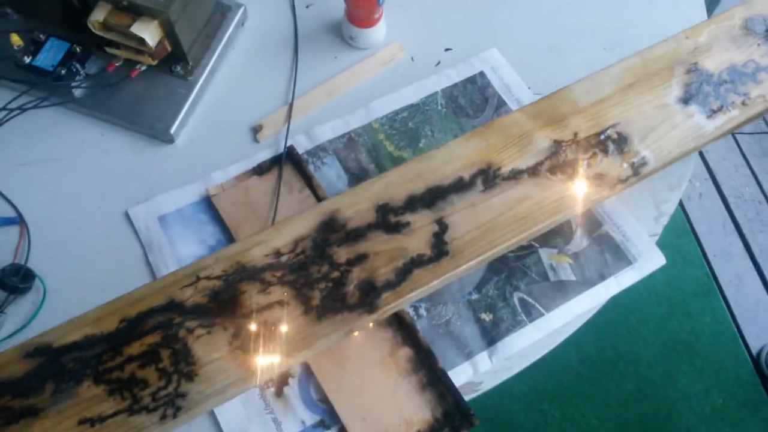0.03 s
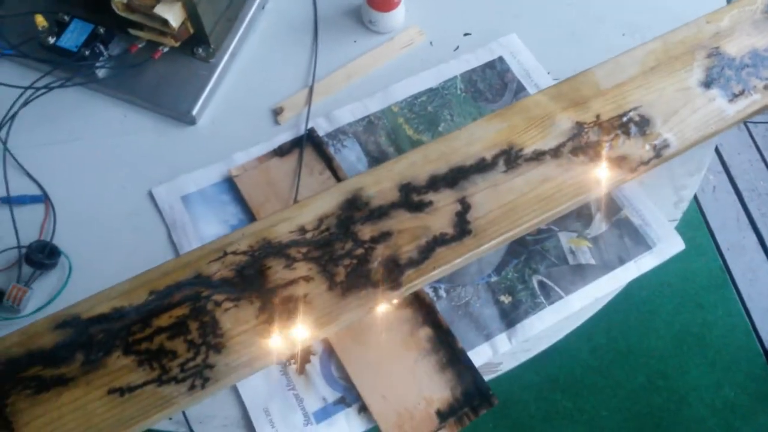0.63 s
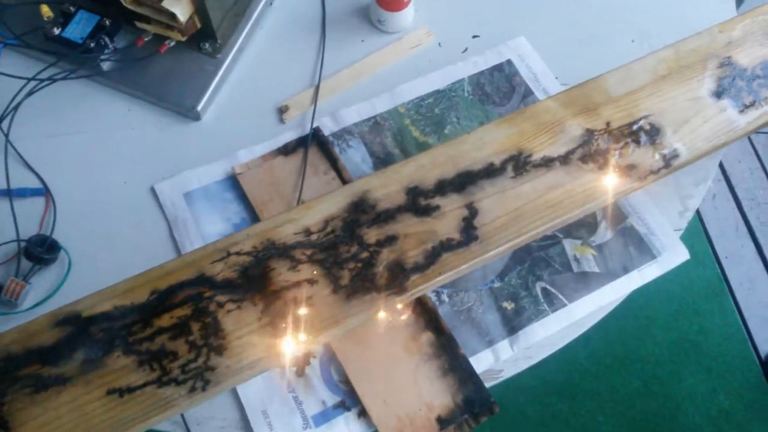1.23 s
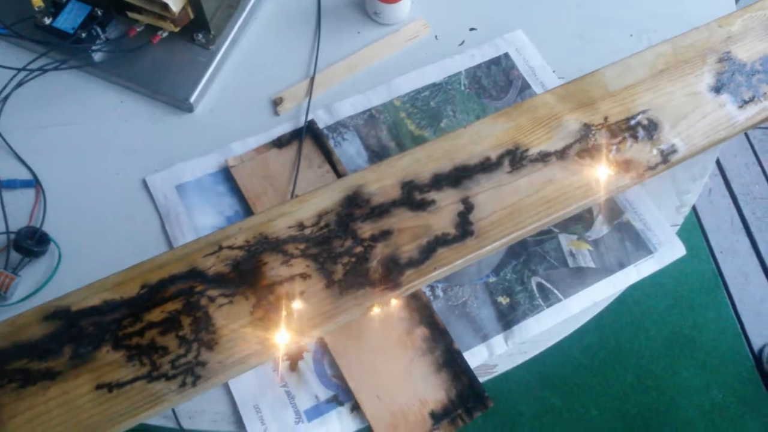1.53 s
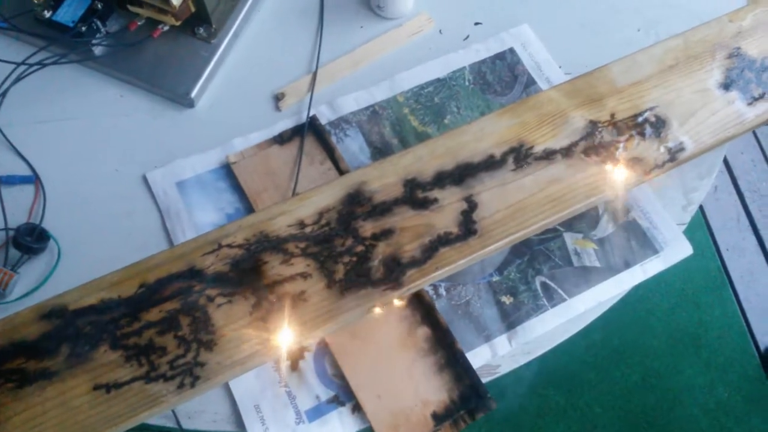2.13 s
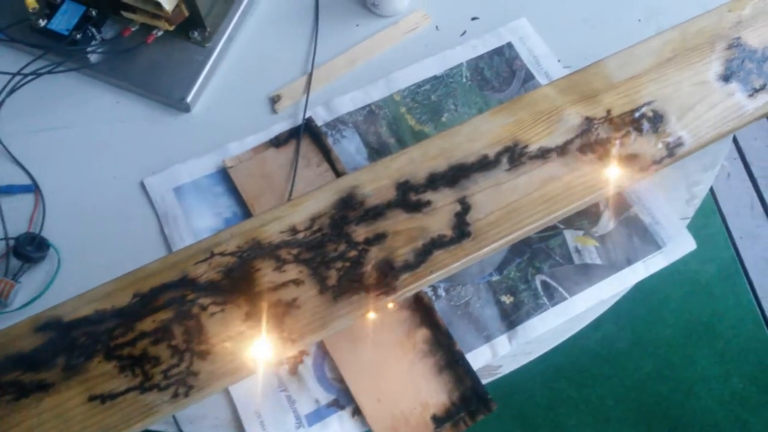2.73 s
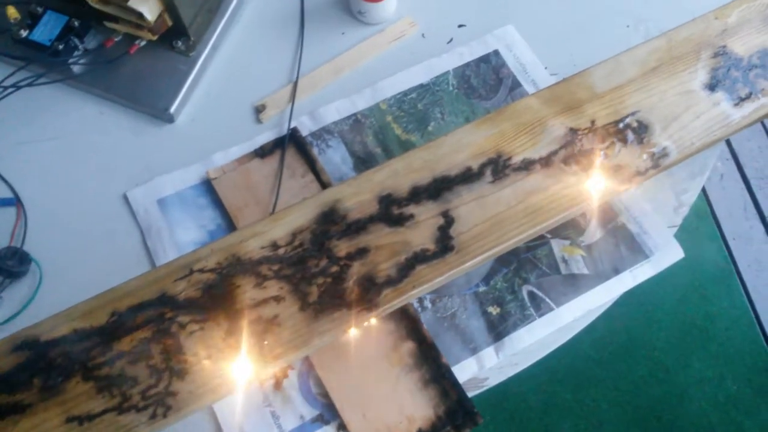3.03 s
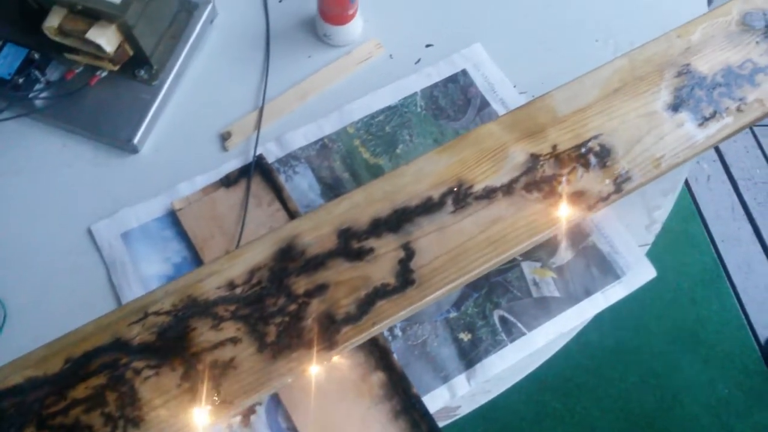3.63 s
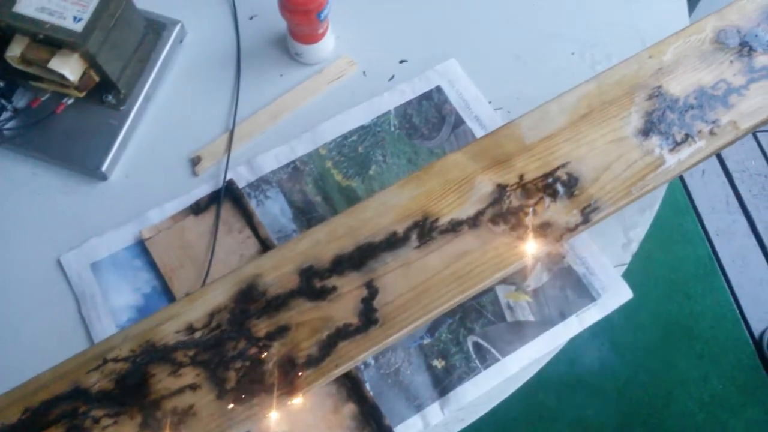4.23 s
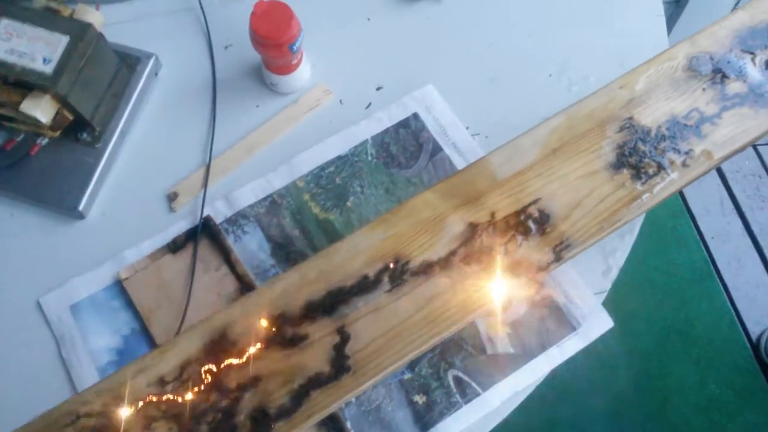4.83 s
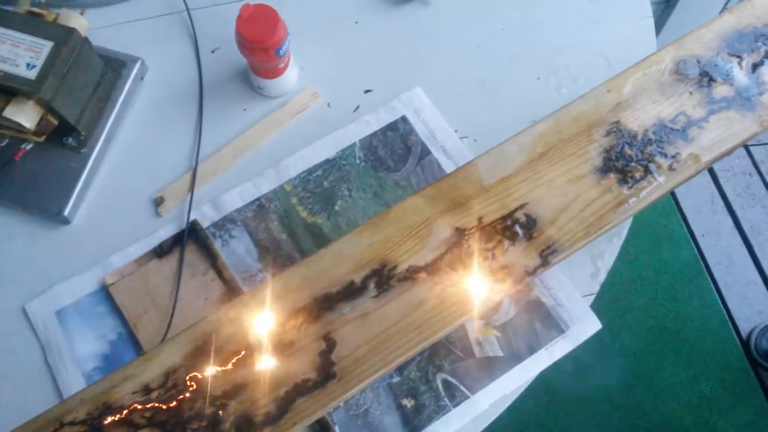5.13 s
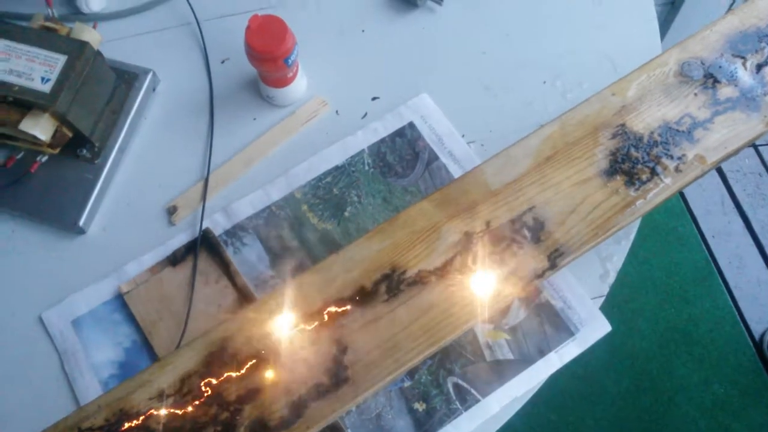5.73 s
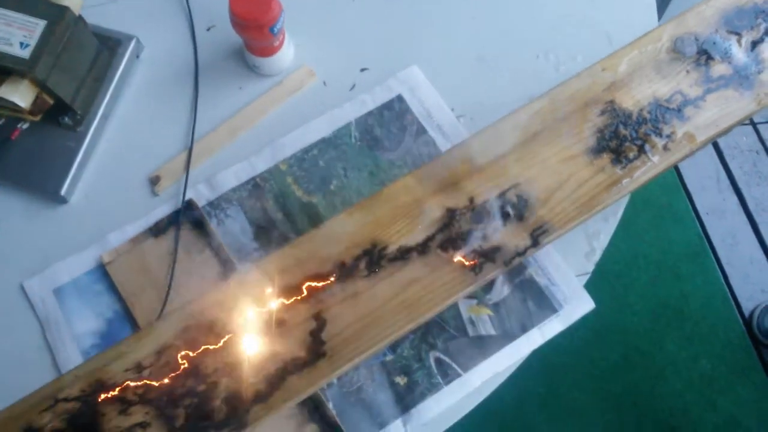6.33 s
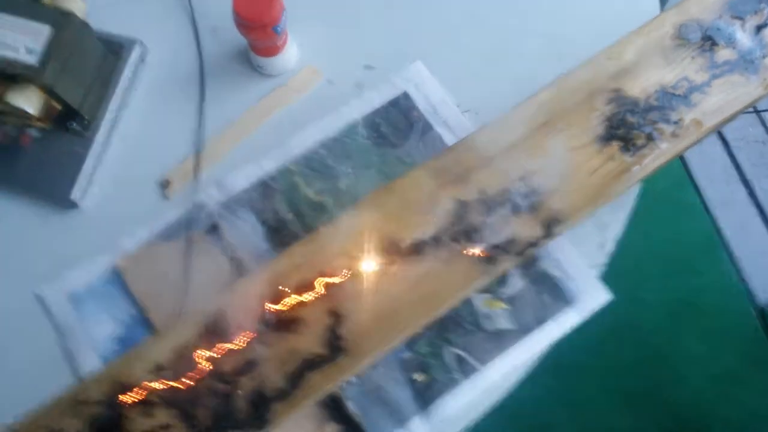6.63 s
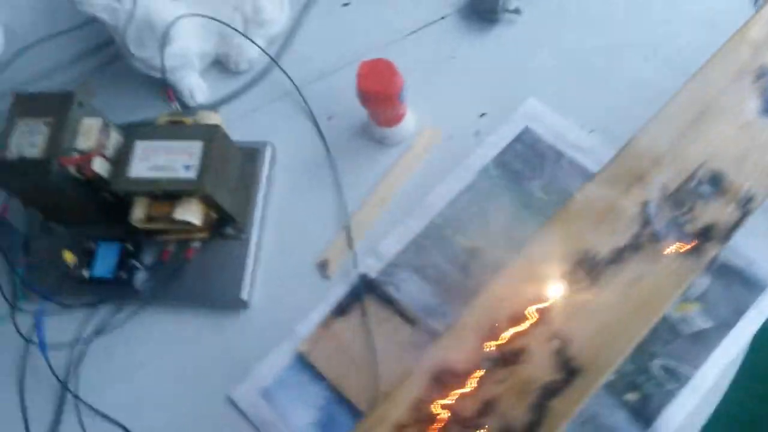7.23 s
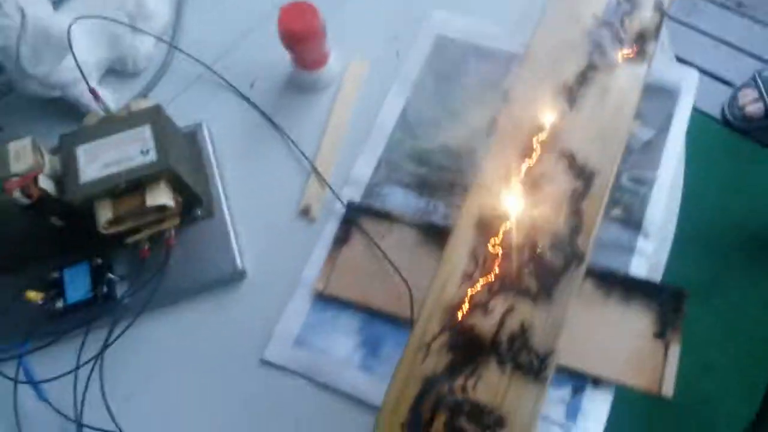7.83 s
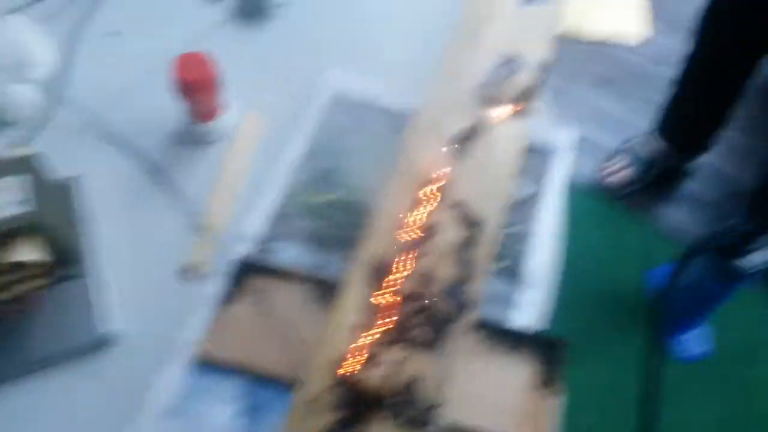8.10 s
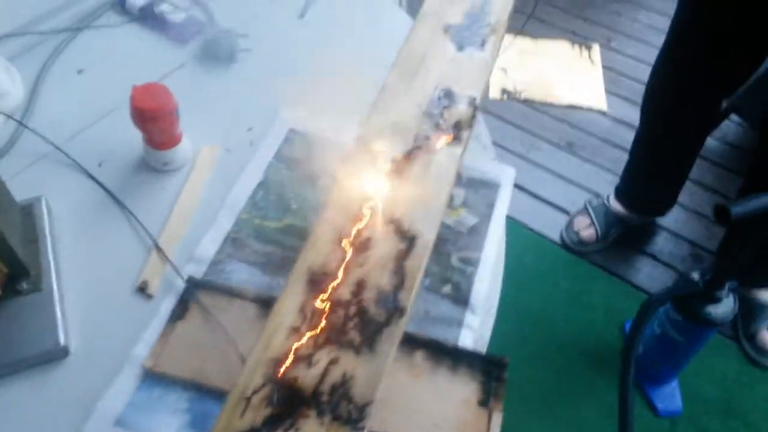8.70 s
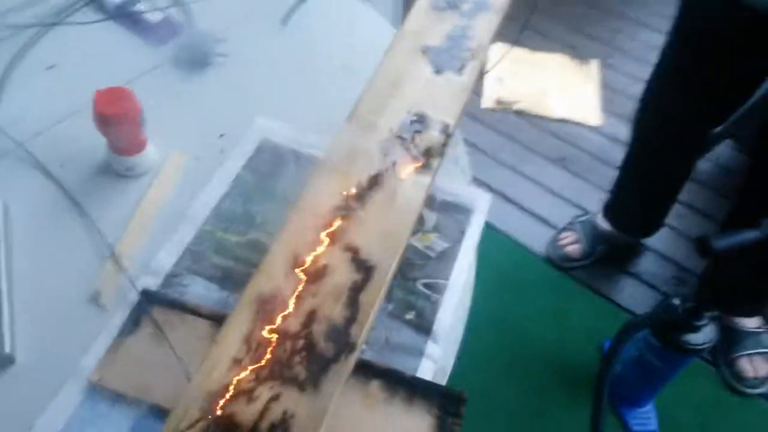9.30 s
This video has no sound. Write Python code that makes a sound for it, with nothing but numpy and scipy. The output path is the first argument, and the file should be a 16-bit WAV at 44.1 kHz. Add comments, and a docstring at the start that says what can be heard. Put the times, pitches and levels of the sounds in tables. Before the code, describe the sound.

A steady low transformer hum, near 200 hertz with buzzy overtones, runs for the whole nine and a half seconds, outdoors over a faint distant rumble and smooth hiss. Electric arcs on a damp plank add a thin, high, pulsing fizz, slightly left, with faint dry crackle and sputtering sap. Soft puffs of steam come in the first half second. The crackle builds over the first second and a half, with small pops around 1.4, 1.8, 2.4 and 2.7 seconds. From 4.6 seconds the arcs break into short flare-ups, with more pops, the strongest at 4.9 and 6.3, and a faint steam whistle at 6.8. After 7 seconds the sizzle is weaker. A dull, hollow thump lands at 7.9. Fingers brush the close hand-held microphone at 8.8, then knock and click on it about five times between 9.1 and 9.3, the loudest moment. The hum continues.

```python
"""Outdoors, at a table: mains transformers hum while their high voltage burns a track along a damp plank.
Arcs on the wood fizz and crackle in time with the current, with small pops, sputtering sap and puffs
of steam, then calm to flare-ups as the track glows. Near the end something thumps dully, and fingers
brush and tap a hand-held camera. A distant rumble and a smooth hiss lie under it all."""
import sys
import numpy as np
from scipy import signal
from scipy.fft import rfft, irfft
from scipy.io import wavfile
from scipy.ndimage import uniform_filter1d

SR = 44100
rng = np.random.default_rng(int(sys.argv[2]) if len(sys.argv) > 2 else 0)


def to_wav(sig):
    """Store sig (one row per channel, or 1-D mono) as 16-bit WAV at the path in sys.argv[1].

    Samples outside -1..1 are clipped; the rate is SR.
    """
    pcm = np.clip(np.atleast_2d(sig), -1, 1) * 32767
    pcm = np.round(pcm).astype(np.int16)
    wavfile.write(sys.argv[1], SR, pcm.T)  # frames by channels


N = 421596
TIME = np.arange(N) / SR
BINS = np.fft.rfftfreq(N, 1 / SR)
GLOW_S = 4.62  # the charred track starts to conduct
USUAL_DB = -60  # arc strength at which fizz and crackle sit at their base levels

# Flare-ups of the arcs. Each row: start in seconds, length in seconds, strength in dB, extra crackle in dB.
FLARES = [(4.388, 0.17, -58, 0), (4.715, 0.33, -61, 3.5), (5.037, 0.34, -62.5, 4), (5.352, 0.33, -58, 0),
          (5.817, .14, -59, 1), (6.023, 0.4, -61.5, -2), (6.74, .15, -61.5, -2), (6.89, 0.11, -60.5, -4),
          (7.88, 1.38, -65, 1.5)]
# Stereo image of crackle and thump noise. Each row: frequency in Hz, likeness from 0 (wide) to 1 (mono).
CRACKLE_LIKENESS = [(100, 0.77), (700, 0.88), (1500, 0.45), (3000, 0.36), (16000, 0.091)]


def hum(mains_cycles, arc_db, load_s=0.3, charring_db=3.0, smear=0.0299, sway=0.048):
    """The cores flex twice a cycle; the partials shift with the load of the arcs and the charring track."""
    # Hum partials. Each row: multiple of the mains (rounded to even for the pitch), level in dB before
    # and after the glow, left over right in dB, flutter depth, dB gained per dB of load.
    partials = [(2, -68, -65.5, -1, 1.47, 0.43), (4.1, -44, -45, -1.5, 0.045, 0.3),
                (5.56, -54.5, -53.5, -3, 0.06, 0.14), (7.7, -62, -60.5, -.5, 0.14, 1.17),
                (9.8, -74.5, -65.5, -4.5, 0.16, 0.5), (12.4, -64.5, -68.5, -2, 0.078, 1),
                (13.8, -66.5, -64.5, -3, 0.052, 0.14), (15.73, -67, -73, -1, 0.047, 0.24),
                (18, -83, -83, -1, 0.28, -2), (19.96, -77, -73, 3, 0.18, 0.6),
                (22.2, -76.5, -81, 2, 0.22, -0.5), (25.2, -102, -79, 2, 0.17, 0),
                (26.05, -77.5, -78.5, -5, 0.16, 0.5), (27.96, -80.5, -80.5, 5, 0.83, 1.5),
                (29.7, -85.5, -81, 1, 0.43, 3)]
    glow = np.clip((TIME - GLOW_S) / 0.11 + .5, 0, 1)
    load_db = uniform_filter1d(arc_db - np.median(arc_db), round(load_s * SR))
    load_db += charring_db * (1 - glow) * (TIME / GLOW_S - .5)
    out = np.zeros((2, N))
    for multiple, first_db, glow_db, side_db, flutter, follow in partials:
        # the casing and the moving camera delay high partials more
        lag = smear * multiple ** 2 + sway * multiple * wander(hz=0.48)
        harmonic = 2 * round(multiple / 2)
        phase = 2 * np.pi * harmonic * mains_cycles - lag
        tone = (1 + flutter * wander(hz=15.0)) * np.cos(phase)
        tone += flutter * wander(hz=5.8) * np.sin(phase)
        level_db = first_db + glow * (glow_db - first_db) + follow * load_db
        out += sides(side_db) * np.sqrt(2) * tone * amp(level_db)
    return out


def arc_strength(ember_db=-67, quench_s=.025, flicker_db=0.67, flicker_hz=14.0):
    """Flickering strength in dB: arcs creep until the track shorts them, then only flare over embers."""
    # Arcs creeping over the damp wood. Each row: time in seconds, strength in dB.
    creep_db = [(0, -71), (.3, -65.5), (.92, -61), (1.15, -61), (1.45, -59), (1.72, -60.5), (2.62, -61),
                (3.3, -58), (3.55, -58), (4.0, -60.5), (4.6, -59.5)]
    creeping = amp(curve(creep_db)) * np.exp(-np.maximum(TIME - GLOW_S, 0) / quench_s)
    flares = [amp(ember_db + (db - ember_db) * flare(s, length_s)) for s, length_s, db, _ in FLARES]
    strongest = np.max([creeping, *flares], axis=0)
    return 20 * np.log10(strongest) + flicker_db * wander(hz=flicker_hz)


def flare(start_s, length_s, rise_s=0.038, fall_s=0.045):
    """Envelope from 0 to 1: a flare-up catches, burns for a while and dies."""
    attack = np.clip((TIME - start_s) / rise_s, 0, 1)
    return attack * np.exp(-np.maximum(TIME - start_s - length_s, 0) / fall_s)


def ignition(mains_cycles, lag, depth_db, uneven_db):
    """Arcs light on every half cycle, each time with a strength of their own."""
    half_cycles = 2 * mains_cycles - lag
    strength = rng.standard_normal(int(half_cycles[-1]) + 3)[np.round(half_cycles).astype(int)]
    pulse_db = depth_db * np.cos(2 * np.pi * half_cycles)
    return unit(amp(pulse_db + uneven_db * strength * np.cos(np.pi * half_cycles) ** 2))


def sparks(per_s, spread_db):
    """Tiny discharges of random size in each channel."""
    size = amp(spread_db * np.minimum(rng.exponential(1, (2, N)), 4))
    polarity = rng.choice([-1, 1], (2, N))
    fires = rng.random((2, N)) < per_s / SR
    return unit(size * polarity * fires)


def fizz(mains_cycles, arc_db, base_db=-55.5, steepness=1.25):
    """Bright sizzle of the arcs, chopped by the current; it fades faster than the arcs do."""
    # Tone of the sizzle. Each row: frequency in Hz, gain in dB.
    sizzle_eq = [(1500, -9), (3000, -11.5), (5000, -4), (7500, -12), (9700, -5), (10800, -8.5), (12300, -5),
                 (13500, -0.5), (15300, -3), (16500, -25)]
    # The sizzle leans mostly left. Each row: frequency in Hz, left over right in dB.
    sizzle_pan = [(2000, 9), (5000, 4.5), (7500, -5), (9700, 7), (11000, 4), (13500, 9.5), (16000, 10)]
    discharges = sparks(per_s=16000, spread_db=1.6)
    discharges *= ignition(mains_cycles, lag=0.16, depth_db=4.0, uneven_db=3.5)
    sizzle = colour(discharges, sizzle_eq)
    panned = irfft(rfft(sizzle) * sides(on_bins(sizzle_pan)), N)
    return amp(base_db + steepness * (arc_db - USUAL_DB)) * unit(panned)


def crackle(mains_cycles, arc_db, base_db=-58.0, snap_follow=1.53, sap_follow=0.52):
    """Dry fibres snap and sap sputters under the arcs; both grow with the arcs, the snaps more so."""
    # Tones of snapping fibres and of boiling sap. Each row: frequency in Hz, gain in dB.
    snap_eq = [(200, -18), (600, -9.5), (900, -0.5), (1450, -1), (2200, -4.5), (3400, -8), (7000, -15),
               (16000, -26)]
    sap_eq = [(40, -19), (130, -2), (260, 4.5), (450, -4.5), (700, -1), (950, -11.5), (1500, -18.5),
              (16000, -57)]
    # Fader for the sap. Each row: time in seconds, level in dB at the usual arc strength.
    sap_fader = [(0, -54), (1.15, -61), (1.35, -58), (2.05, -54.5), (3.8, -57.5), (4.9, -55), (5.6, -57.5),
                 (7.1, -59.5), (7.7, -60.5), (9.05, -55), (9.56, -60)]
    snaps = sparks(per_s=2600, spread_db=3.5)
    snaps *= ignition(mains_cycles, lag=0.12, depth_db=3.0, uneven_db=2.5)
    boils = sparks(per_s=3500, spread_db=1.7)
    boils *= ignition(mains_cycles, lag=.05, depth_db=1.0, uneven_db=4.0)
    flare_db = sum(db * flare(s, length_s) for s, length_s, _, db in FLARES)
    snap_db = base_db + flare_db + snap_follow * (arc_db - USUAL_DB)
    sap_db = curve(sap_fader) + sap_follow * (arc_db - USUAL_DB)
    bright = amp(snap_db) * unit(colour(blend(snaps, CRACKLE_LIKENESS), snap_eq))
    dull = amp(sap_db) * unit(colour(blend(boils, CRACKLE_LIKENESS), sap_eq))
    return bright + dull


def pops(scatter=0.12, scatter_s=0.0071, plank_hz=470, plank_db=-10, plank_t60=0.033,
         snap_db=-7, snap_s=0.00033, snap_hz=4500):
    """Each pop snaps, rings very briefly and knocks the plank, then scatters off the table."""
    # Pops and spits in the wood. Each row: start in seconds, level in dB, ring pitch in Hz,
    # ring decay in cycles, left over right in dB.
    pop_cues = [(0.029, -35.5, 1570, 3.9, 5), (1.354, -33, 1100, 0.64, 4), (1.375, -32.5, 1200, 0.64, 3),
                (1.783, -38, 790, .7, 2), (2.024, -43, 500, 2.6, -5), (2.397, -36, 1400, 0.6, 2.5),
                (2.666, -35, 800, 1, 2), (2.736, -31.5, 1080, 0.51, -1), (4.664, -39, 1570, 3.5, 0),
                (4.8982, -26.5, 1100, 0.77, 1), (4.949, -33, 650, 0.73, 0), (5.068, -30, 2200, 0.27, 2),
                (5.110, -34, 1200, .6, 0), (5.640, -31, 1600, 0.56, 0), (5.750, -33, 3500, 0.25, 0),
                (6.344, -29.5, 1270, 1.4, 3), (6.869, -38, 1580, 4, 3), (7.105, -44.5, 646, 4.5, -7),
                (8.9571, -33.5, 870, 0.57, -13)]
    out, t = np.zeros((2, N)), np.arange(2048) / SR
    plank = mode(t, plank_hz, plank_db, plank_t60)
    lowpass = signal.butter(1, snap_hz, fs=SR)
    for start_s, db, hz, cycles, side_db in pop_cues:
        ring = np.cos(2 * np.pi * hz * t) * np.exp(-t * hz / cycles) * rise(t, .00006)
        diffuse = signal.fftconvolve(rng.standard_normal((2, len(t))), ring[None], axes=1)[:, :len(t)]
        echoes = scatter * unit(diffuse) * np.exp(-t / scatter_s)
        snap = amp(snap_db) * signal.lfilter(*lowpass, rng.standard_normal(len(t)) * np.exp(-t / snap_s))
        knock = plank * min(2 * plank_hz / hz, 1)  # sharp spits hardly move the wood
        add(out, start_s, amp(db) * sides(side_db) * (snap + ring + knock + echoes))
    return out


def steam_and_brushing():
    """Steam whistles and fingers brush the camera: short swells of noise, each in one resonance."""
    # Swells. Each row: peak time in seconds, half length in seconds, level in dB, centre in Hz,
    # width of each filter pass in Hz, left over right in dB.
    swell_cues = [(0.061, 0.16, -56.5, 1490, 800, 5), (0.398, 0.22, -63.5, 1600, 330, 2),
                  (6.802, 0.14, -65, 1450, 455, 6.5), (6.795, .02, -61, 1555, 50, 6),
                  (8.774, 0.014, -46, 546, 850, -16), (8.829, 0.0047, -47.5, 520, 700, -11)]
    out = np.zeros((2, N))
    for peak_s, half_s, db, hz, width_hz, side_db in swell_cues:
        t = np.arange(-2 * half_s, 2 * half_s, 1 / SR)
        noise = rng.standard_normal((2, 2 * SR))[:, :len(t)]
        resonance = signal.iirpeak(hz, hz / width_hz, SR)
        band = signal.lfilter(*resonance, signal.lfilter(*resonance, noise))
        swell = amp(db) * sides(side_db) * unit(band) * np.exp(-(t / half_s) ** 2)
        add(out, peak_s + t[0], swell[:, peak_s + t >= 0])
    return out


def thump(start_s=7.9298, rise_s=0.017):
    """A soft blow swells into the low modes of a hollow surface, which rattles; the surroundings answer."""
    # Modes of the surface. Each row: pitch in Hz, gain in dB, seconds to fall 60 dB.
    surface_modes = [(159, 0.5, 0.11), (181.5, -27, 0.25), (137, -30, 0.17), (72.5, -35, 0.38),
                     (290, -24, 0.21), (344, -23.5, 0.12), (463, -32, 0.16), (632, -34, 0.13)]
    # Tones of the attack, the rattle and the tail. Each row: frequency in Hz, gain in dB.
    crack_eq = [(200, -5), (700, 0), (1500, -5), (3200, -7), (3800, -30), (16000, -54)]
    rattle_eq = [(80, -16), (200, 1), (320, -2), (600, -1), (900, -12.5), (1350, -20), (1700, -29),
                 (3200, -31), (3800, -41), (16000, -70)]
    tail_eq = [(50, -18), (110, 1), (165, 3), (240, -6), (400, -21), (800, -28), (2000, -40), (16000, -80)]
    out, t = np.zeros((2, N)), TIME[:SR]
    body = -sum(mode(t, hz, db, t60) for hz, db, t60 in surface_modes) * rise(t, rise_s)
    crack = burst(crack_eq, db=-40, t60=0.041)
    rattle = burst(rattle_eq, db=-26.5, t60=0.2) * rise(t, 0.0096)
    tail = burst(tail_eq, db=-36.5, t60=0.89) * rise(t, 0.022)
    add(out, start_s, sides(-2.7) * body + crack + rattle + tail)
    return out


def taps(push_cycles=0.32):
    """A finger pushes air into a microphone port while the camera case clicks and rings."""
    # Finger taps. Each row: start in seconds; the push's gain in dB, pitch in Hz, rise in seconds and
    # pan; the case ring's gain in dB and pan; the click's level in dB and pan. Pan is left over right in dB.
    tap_cues = [(9.1093, -17.5, 153, 0.000027, -23.5, -40, -18, -18.5, -17),
                (9.1230, -16, 95, .0006, 4, -22, 9, -25, 10),
                (9.1550, -29, 120, .0005, 16, -30.5, 1, -29, 13),
                (9.1851, -7.5, 128, 0.0013, -14.5, -16.5, 7.5, -20.5, 26.5),
                (9.2494, -26.5, 190, 0.0008, -12, -53, -5, -60, 0)]
    # Tone of the click. Each row: frequency in Hz, gain in dB.
    click_eq = [(300, -10), (730, -7), (1400, -4), (2800, -5.5), (3600, -3), (4600, -4), (6500, -6.5),
                (8500, -12), (11000, -13), (13000, -7.5), (15500, -3), (17000, -20)]
    # Modes of the case. Each row: pitch in Hz, gain in dB, seconds to fall 60 dB.
    case_modes = [(402, -3.5, 0.015), (1430, -1.5, 0.0066), (1750, -6.5, .005), (2400, -8, 0.0036)]
    out, t = np.zeros((2, N)), np.arange(2048) / SR
    click = colour(signal.unit_impulse(N), click_eq)[:len(t)]
    click /= abs(click).max()
    case = -sum(mode(t, hz, db, t60) for hz, db, t60 in case_modes)
    for start_s, push_db, hz, rise_s, push_pan, case_db, case_pan, click_db, click_pan in tap_cues:
        push = -np.cos(2 * np.pi * hz * t) * np.exp(-t * hz / push_cycles) * rise(t, rise_s)
        add(out, start_s, amp(push_db) * sides(push_pan) * push)
        add(out, start_s, amp(case_db) * sides(case_pan) * case)
        add(out, start_s, -amp(click_db) * sides(click_pan) * click)
    return out


def air():
    """The outdoor bed: distant rumble and a smooth hiss, drifting gently in level."""
    # Tone of the bed. Each row: frequency in Hz, gain in dB.
    bed_eq = [(15, -41), (27, -17), (34, 6.5), (70, -2), (150, -2.5), (300, -8.5), (600, -14),
              (1000, -16.5), (2300, -17), (3500, -20.5), (8000, -25.5), (12000, -23), (14500, -25.5),
              (16000, -22)]
    # Centred lows, wide highs. Each row: frequency in Hz, channel likeness from 0 to 1.
    bed_likeness = [(30, 1), (100, 0.37), (250, 0.24), (700, 0), (2000, 0), (16000, 0)]
    noise = colour(blend(rng.standard_normal((2, N)), bed_likeness), bed_eq)
    return amp(-53.0 + 0.66 * wander(hz=2.5)) * unit(noise)


def amp(db):
    """Decibels to gain."""
    return 10 ** (np.asarray(db) / 20)


def unit(x):
    """Scales to an rms of one."""
    return x / np.sqrt(np.mean(x ** 2) + 1e-20)


def sides(db):
    """Stereo gains that put left db above right."""
    return amp(np.array([[.5], [-.5]]) * db)


def curve(rows):
    """A control curve, sample by sample."""
    return np.interp(TIME, *np.transpose(rows))


def rise(t, rise_s):
    """A soft attack from 0 towards 1."""
    return 1 - np.exp(-t / rise_s)


def mode(t, hz, db, t60):
    """One resonance ringing out."""
    return amp(db - 60 * t / t60) * np.sin(2 * np.pi * hz * t)


def on_bins(points):
    """Spreads (Hz, value) points over all bins on a log frequency scale."""
    hz, value = np.transpose(points)
    return np.interp(np.log(BINS + 1), np.log(hz + 1), value)


def colour(x, eq):
    """Minimum-phase equaliser."""
    log_gain = np.log(amp(on_bins(eq)))
    phase = -signal.hilbert(np.r_[log_gain, log_gain[-2:0:-1]]).imag[:len(BINS)]
    return irfft(rfft(x) * np.exp(log_gain + 1j * phase), N)


def blend(x, likeness):
    """Blends two unrelated channels until they are as alike as asked."""
    spectra = rfft(x)
    angle = np.arcsin(np.clip(on_bins(likeness), 0, 1)) / 2
    return irfft(np.cos(angle) * spectra + np.sin(angle) * spectra[::-1], N)


def burst(eq, db, t60):
    """One second of dying noise in the given tone."""
    noise = unit(colour(blend(rng.standard_normal((2, N)), CRACKLE_LIKENESS), eq))
    return noise[:, :SR] * amp(db - 60 * TIME[:SR] / t60)


def wander(hz):
    """Random drift up to about the given rate."""
    rates = np.fft.rfftfreq(2048, TIME[-1] / 2048)
    slow = irfft(rfft(rng.standard_normal(2048)) / (1 + (rates / hz) ** 2))
    return unit(np.interp(TIME, np.linspace(0, TIME[-1], len(slow)), slow))


def add(mix, start_s, sound):
    """Lays a stereo sound into the mix."""
    part = mix[:, max(round(start_s * SR), 0):][:, :sound.shape[1]]
    part += sound[:, :part.shape[1]]


def from_table(x, left_delay_s=.00011):
    """Sound from the table takes a longer path to the left microphone."""
    delays_s = np.array([[left_delay_s], [0]])
    return irfft(rfft(x) * np.exp(-2j * np.pi * BINS * delays_s), N)


def scene():
    """One supply and one arc strength drive hum, fizz and crackle; the other layers play on their own."""
    # The slightly drifting supply. Each row: time in seconds, frequency in Hz.
    mains_hz = [(0, 49.902), (9.56, 49.958)]
    mains_cycles = np.cumsum(curve(mains_hz)) / SR
    arc_db = arc_strength()
    burning = hum(mains_cycles, arc_db) + fizz(mains_cycles, arc_db) + crackle(mains_cycles, arc_db)
    return from_table(burning + pops()) + air() + steam_and_brushing() + thump() + taps()


def record(dry):
    """A steep low-pass trims the very top of the treble."""
    lowpass = signal.firwin(511, cutoff=15700, window=("kaiser", 9), fs=SR)
    return signal.oaconvolve(dry, lowpass[None], "same")


dry = scene()
out = record(dry)
to_wav(out)
```